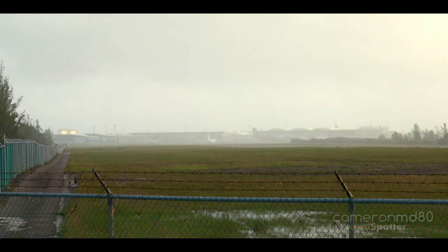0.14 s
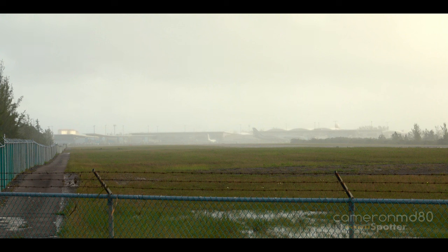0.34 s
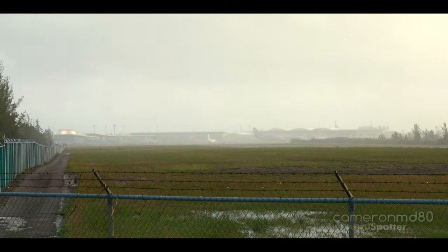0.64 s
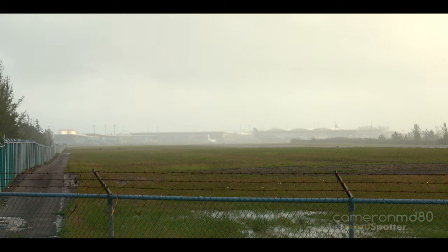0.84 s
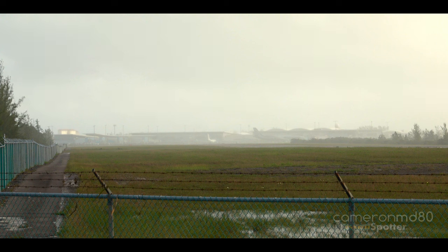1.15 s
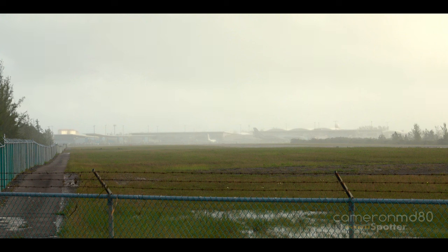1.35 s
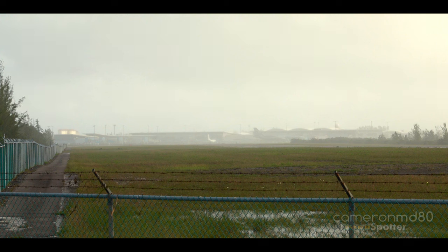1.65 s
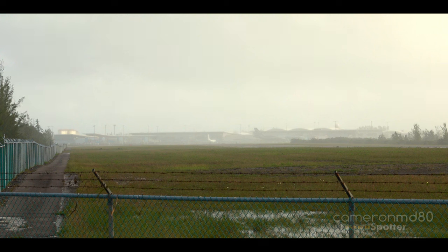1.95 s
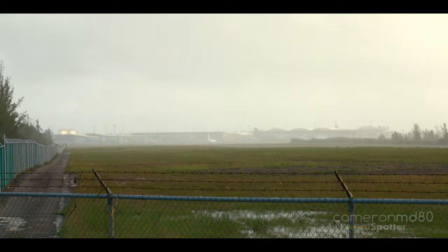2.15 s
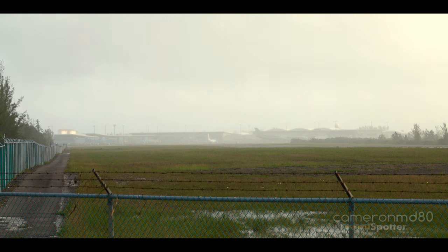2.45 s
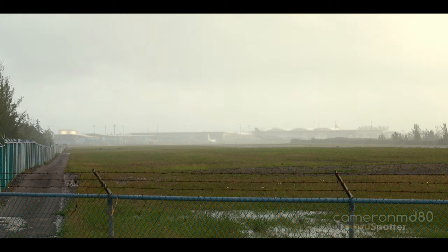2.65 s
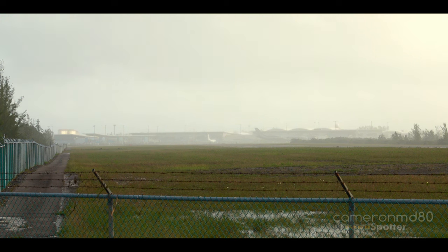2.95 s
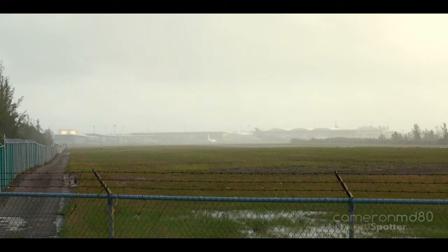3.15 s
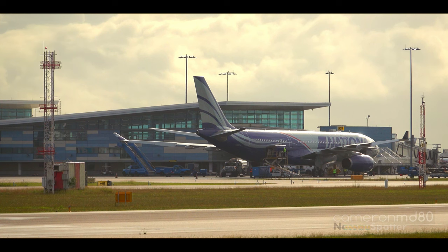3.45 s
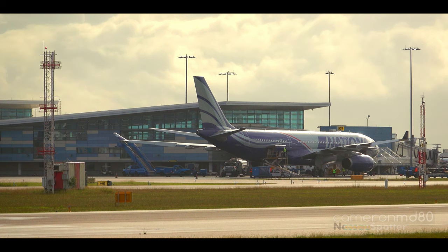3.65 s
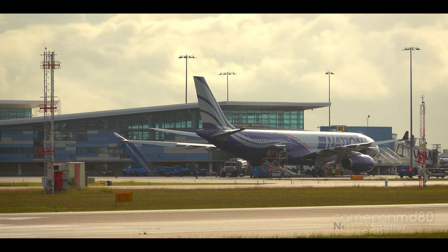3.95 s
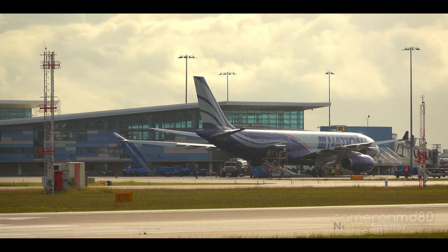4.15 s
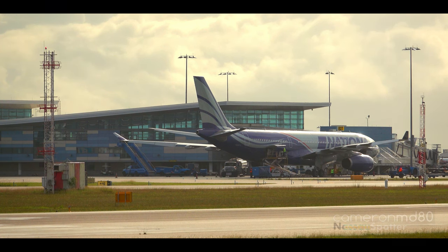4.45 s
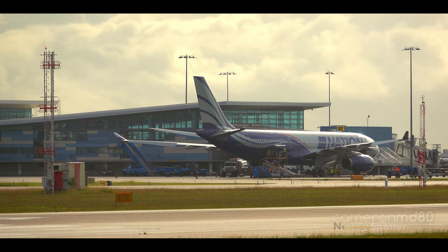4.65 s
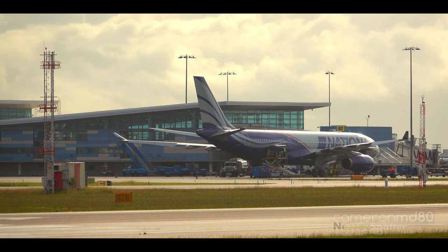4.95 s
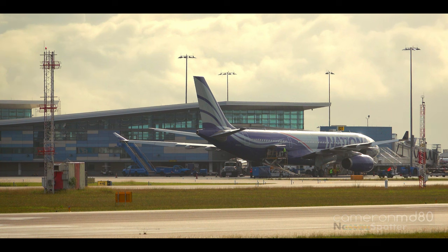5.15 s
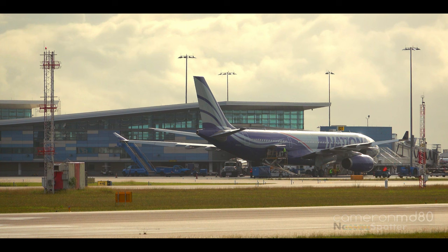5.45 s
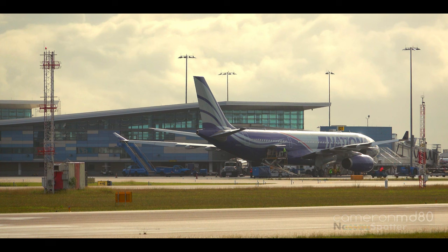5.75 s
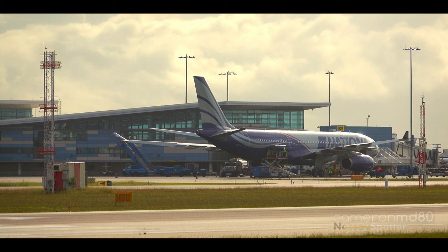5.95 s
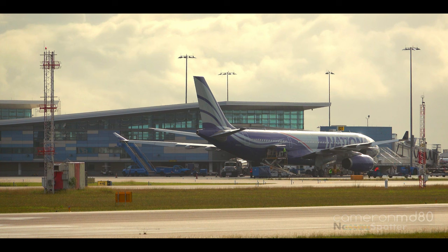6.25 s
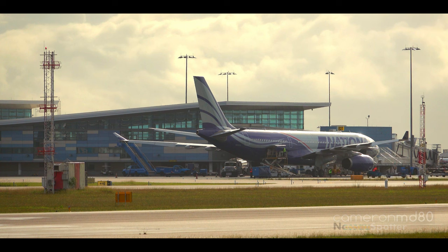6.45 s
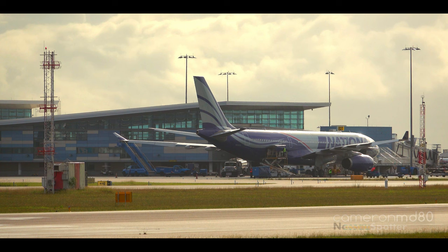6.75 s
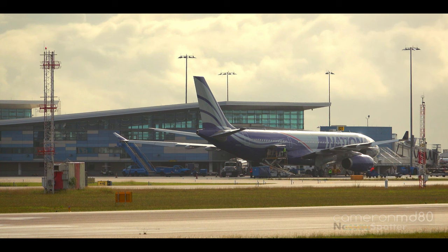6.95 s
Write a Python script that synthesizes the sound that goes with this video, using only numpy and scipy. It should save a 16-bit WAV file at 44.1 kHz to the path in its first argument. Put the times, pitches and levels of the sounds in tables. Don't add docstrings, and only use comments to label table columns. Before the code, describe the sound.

Wind thumps the microphone as a deep engine hum fades and a rushing airport roar with faint turbine whine takes over.

```python
import sys
import numpy as np
from scipy import signal
from scipy.fft import rfft, irfft, next_fast_len
from scipy.io import wavfile
from scipy.ndimage import uniform_filter1d, map_coordinates

SR = 44100
rng = np.random.default_rng(int(sys.argv[2]) if len(sys.argv) > 2 else 0)


def digitize_waveform(pressure):
    field = np.atleast_2d(pressure).T
    bounded = np.clip(field, -1, 1)
    quanta = np.round(bounded * 32767).astype(np.int16)
    wavfile.write(sys.argv[1], SR, quanta)


def voltage_ratio(level):
    return 10 ** (np.asarray(level, float) / 20)


N = 312669
T = np.arange(N) / SR


def unit(x):
    return x / np.sqrt(np.mean(x ** 2) + 1e-20)


def along(points, hz):
    f, v = np.transpose(points)
    return np.interp(np.log(hz + 1), np.log(f + 1), v)


def curves(rows):
    seconds, *columns = np.transpose(rows)
    return [np.interp(T, seconds, column) for column in columns]


def bumps(rows):
    return sum(size * np.exp(-((T - s) / half) ** 2) for s, half, size in rows)


def wobble(rate):
    knots = rng.standard_normal(int(N * 80 / SR) + 4)
    return map_coordinates(knots, [T * min(rate, 80)])


def tone(hz):
    return np.sin(2 * np.pi * np.cumsum(hz) / SR)


def filtered(x, response):
    m = next_fast_len(N + SR // 2)
    return irfft(rfft(x, m) * response(np.fft.rfftfreq(m, 1 / SR)), m)[:N]


def rush(spectrum, patchy_db):
    z = signal.stft(rng.standard_normal(N), nperseg=512)[2]
    patches = uniform_filter1d(rng.standard_normal(z.shape), size=5, axis=0)
    patches = uniform_filter1d(patches, size=14, axis=1)
    x = signal.istft(z * voltage_ratio(patchy_db * unit(patches)), nperseg=512)[1][:N]
    return unit(filtered(x, lambda hz: voltage_ratio(along(spectrum, hz))))


# (start [s], end [s])
FADE = (2.32, 3.86)


def fade():
    start, end = FADE
    turn = np.pi / 2 * np.clip((T - start) / (end - start), 0, 1)
    return np.cos(turn), np.sin(turn)


def blend(field_db, terminal_db):
    field, terminal = fade()
    return np.hypot(field * voltage_ratio(field_db), terminal * voltage_ratio(terminal_db))


# (frequency [Hz], density [dB per Hz])
SELF_NOISE = [(3000, -21), (6000, 3), (9500, -1.5), (16000, -3)]
# (time [s], half length [s], level [dB])
GAIN_SAG = [
    (1.6, .7, -1.8),
    (5.0, 0.69, 1.1),
    (6.2, 0.61, -1),
]


def microphone_hiss():
    level = blend(-75, -71.5) * voltage_ratio(3.5 + bumps(GAIN_SAG))
    return level * rush(SELF_NOISE, patchy_db=0.2)


# (frequency [Hz], density [dB per Hz])
WINGS = [(7300, -46.5), (7700, -12), (8050, -6.5), (8300, -4), (8550, -4.5), (8750, -13), (8950, -8.5),
         (9150, -23), (9500, -47.5)]
# (time [s], half length [s], level [dB])
CHORUS_SWAY = [
    (.65, .3, 2),
    (2.65, 0.06, 3),
    (4.1, .25, 2.8),
    (5.4, 0.62, 2),
    (6.4, .3, -0.5),
]


def insect_chorus():
    lead_depth, lead_grows_s = 0.6, 2.1
    depth = lead_depth * np.clip(0.3 + 0.7 * T / lead_grows_s, 0, 1) * fade()[0] ** 2
    beat = 1 + depth * np.cos(2 * np.pi * (57.2 * T - 0.18))
    shimmer = beat * voltage_ratio(0.29 * wobble(9) + 0.29 * wobble(35))
    level = blend(-79, -65.5) * voltage_ratio(bumps(CHORUS_SWAY))
    return level * unit(shimmer * rush(WINGS, patchy_db=1.0))


def cricket():
    stroke = (42.04 * T + 0.05) % 1
    gate = np.clip(1 - ((stroke - 0.5) / 0.31) ** 2, 0, 1)
    hz = 7130 - 260 * (stroke - 0.5) + 30 * wobble(70)
    trill = unit(gate * voltage_ratio(0.8 * wobble(40)) * tone(hz))
    level_db = -73 + bumps([(0.85, 0.25, -3)])
    return voltage_ratio(level_db) * fade()[0] ** 0.56 * trill


# (start [s], length [s], rms level [dB])
LENS = [
    (1.105, .045, -68.5),
    (1.185, 0.071, -75),
    (1.34, 0.13, -66),
    (1.46, .1, -71),
    (1.6, .15, -86),
    (2.335, 0.39, -66),
    (2.79, 0.15, -76.5),
]
# (frequency [Hz], width [Hz], level [dB])
LENS_BODY = [(2800, 1500, -11.5), (4320, 290, 0), (5800, 1500, -15)]


def lens_body(f):
    total = 0
    for k, (centre, width, db) in enumerate(LENS_BODY):
        total = total + (-1) ** k * voltage_ratio(db) * 1j * f * width / (centre ** 2 - f ** 2 + 1j * f * width)
    return total


def lens_motor():
    teeth_per_s, spin_up_s, run_down_s = 104.5, 0.03, 0.04
    at = (np.arange(110, 320) + 0.36 + 0.04 * rng.standard_normal(210)) / teeth_per_s
    ticks = np.zeros(N)
    ticks[(at * SR).astype(int)] = voltage_ratio(2.4 * rng.standard_normal(len(at)))
    ticks += 0.055 * rng.standard_normal(N)
    running = np.zeros(N)
    for start, length, db in LENS:
        spin_up = np.clip((T - start) / spin_up_s, 0, 1)
        run_down = np.exp(-np.clip(T - start - length, 0, None) / run_down_s)
        running += voltage_ratio(db) * spin_up * run_down
    return running * unit(filtered(ticks, lens_body))


# (time [s], peak level [dB])
CLICKS = [(1.1386, -47), (1.338, -32), (1.365, -52), (1.713, -45), (1.762, -50), (2.35, -53), (2.394, -48),
          (2.541, -52), (2.569, -54), (2.646, -48), (2.769, -50), (2.803, -52)]
# (frequency [Hz], level [dB], time to fall 60 dB [s])
SHELL = [(1300, 4.5, 0.014), (1980, -6, .01), (3700, -8, 0.02), (3920, -4.5, 0.01), (4900, -9, 0.0069),
         (5600, -22, 0.0037), (6860, -11, .006), (6730, -9.5, 0.0069), (7800, -14, 0.0044),
         (9000, -11, 0.0031)]


def body_clicks():
    out = np.zeros(N)
    t = T[:SR // 20]
    ring = sum(voltage_ratio(db - 60 * t / t60) * np.sin(2 * np.pi * hz * t) for hz, db, t60 in SHELL)
    rise = 1 - np.exp(-(t / 0.0002) ** 2)
    bright = np.diff(np.hanning(10))
    for s, db in CLICKS:
        noise = np.convolve(rng.standard_normal(len(t)), bright, "same")
        crack = 0.9 * voltage_ratio(-60 * t / 0.006) * noise
        out[round(s * SR):][:len(t)] += voltage_ratio(db - 3) * rise * (ring + crack)
    return out


# (time [s], half length [s], level [dB])
RUBS = [
    (1.13, .012, -69),
    (1.367, .01, -67),
    (1.39, .01, -65),
    (1.415, .014, -59),
    (1.438, .01, -64),
    (1.5, .05, -69),
    (3.33, .025, -67),
    (3.41, .05, -63.5),
    (3.59, .035, -65),
]
# (frequency [Hz], density [dB per Hz])
SKIN = [(1000, -40), (2000, -4), (3000, 0), (4000, -7), (5000, -8), (6100, -5), (7500, -9), (9500, -10),
        (10800, -24), (16000, -36)]


def sliding_hand():
    slide = bumps([(s, half, voltage_ratio(db)) for s, half, db in RUBS])
    return slide * unit(voltage_ratio(2 * wobble(79)) * rush(SKIN, patchy_db=2.5))


# (time [s], level [dB])
WIND = [(0, -32.5), (.5, -33), (1.05, -25.5), (1.55, -31.5), (2.0, -30), (3.3, -29.5), (3.7, -31),
        (4.3, -27.5), (5.2, -26), (5.6, -27), (6.3, -24.5), (6.6, -33), (7.09, -29)]
# (frequency [Hz], density [dB per Hz])
BUFFET = [(2, -18.5), (8, 4), (16, 2), (27, 3.5), (50, -12.5), (75, -26.5), (120, -80), (300, -150)]
# (time [s], level over the wind [dB])
BLOWS = [(.42, 7), (.6, 1), (0.831, 3.5), (1.06, 5), (1.15, 18), (1.451, 22), (1.75, 5.5), (2.19, 1),
         (2.5, 6), (2.7, 4.5), (3.47, 7), (3.7, 18), (3.85, 8), (4.04, 8), (4.548, 7.5), (4.75, 2),
         (4.86, 1), (5.341, 10), (5.52, 12), (5.65, 11.5), (5.95, 7.5), (6.289, 12.5), (6.651, 10.5),
         (6.84, 9.5)]


def wind():
    blow_half_s, lull_db = 0.036, 0.5
    x = rush(BUFFET, patchy_db=2.5)
    x /= np.sqrt(np.abs(uniform_filter1d(x ** 2, size=SR // 10)) + 0.29)
    blows_db = bumps([(s, blow_half_s, db) for s, db in BLOWS])
    x = voltage_ratio(curves(WIND)[0] + lull_db + blows_db) * unit(x)
    return x / (1 + np.abs(x / 0.2) ** 4) ** (1 / 4)


# (frequency [Hz], density [dB per Hz])
FIELD = [(40, -45), (60, 16.5), (110, -0.5), (150, -8), (300, -17.5), (800, -22), (1000, -28.5),
         (1280, -31.5), (1400, -24), (1550, -33), (2500, -43), (4400, -53), (5000, -55.5), (9000, -61.5)]
TERMINAL = [(40, -19), (60, 9), (116, -2), (480, -11), (690, -14), (910, -21), (1400, -21), (1650, -28.5),
            (2700, -35.5), (3100, -39.5), (4300, -41.5), (4800, -44.5), (7200, -49.5), (9000, -60.5)]
# (frequency [Hz], ..)
SPLITS_HZ = (30, 140, 420, 900, 2600, 11000)
# (level [dB], ..)
FIELD_DB = (-41, -45, -48.5, -54, -66)
TERMINAL_DB = (-36.5, -47, -50.5, -46.5, -64.5)
# (time [s], level [dB])
AIR = [(0, -1), (.9, -0.5), (1.65, 1.5), (1.85, -4.5), (2.2, -3), (2.6, -0.4), (3.3, 2), (3.9, 0.3),
       (4.4, 0.75), (5.2, 0.1), (6.4, -1), (6.8, 0), (7.09, 2)]
AIR_SHARE = (.1, 0.22, 0.34, 1.1, 0.79)
# (time [s], half length [s], level [dB], centre [Hz])
SURGES = [(1.199, 0.15, 12.5, 287), (1.5, 0.15, 10, 218), (1.947, 0.17, 4.5, 260), (2.33, 0.1, -6, 68.2),
          (2.77, 0.16, 7.5, 380), (3.1, 0.28, 5.5, 70.53), (3.293, 0.093, 5, 398), (3.485, 0.22, 7.5, 4010),
          (3.694, .15, -0.5, 72), (5.0, 0.069, -2.5, 68.6), (5.48, 0.15, 2, 1806), (6.0, 0.21, 0.5, 1410),
          (5.8, 0.28, -9.5, 129.6), (6.287, 0.069, 6, 122), (6.609, 0.12, 4, 348), (6.901, 0.097, -8, 70)]


def below(hz, edge):
    return 1 / (1 + (hz / edge) ** 6)


def roar():
    surge_octaves = 0.96
    air_db, = curves(AIR)
    field, terminal = fade()
    field_noise = rush(FIELD, patchy_db=0.94)
    terminal_noise = rush(TERMINAL, patchy_db=0.8)
    total = np.zeros(N)
    bands = zip(AIR_SHARE, SPLITS_HZ, SPLITS_HZ[1:], FIELD_DB, TERMINAL_DB)
    for share, lo, hi, field_db, terminal_db in bands:
        band = lambda hz: np.sqrt(np.abs(below(hz, hi) - below(hz, lo)))
        near = lambda hz: np.exp(-(np.log2(hz / np.sqrt(lo * hi)) / surge_octaves) ** 2)
        surge_db = bumps([(s, half, db * near(hz)) for s, half, db, hz in SURGES])
        here = voltage_ratio(field_db) * field * unit(filtered(field_noise, band))
        there = voltage_ratio(terminal_db) * terminal * unit(filtered(terminal_noise, band))
        total += voltage_ratio(share * air_db + surge_db) * (here + there)
    return total


def far_lines(table, drift_hz, flutter_db):
    total = np.zeros(N)
    for hz, db in table:
        level = voltage_ratio(db + 3 + flutter_db * wobble(3))
        total += level * tone(hz + drift_hz * wobble(6))
    return total


# (frequency [Hz], level [dB])
WHINES = [(694.8, -59), (1395, -61), (3757.5, -81), (3856.5, -83), (3955, -88), (4054, -88), (4153, -85),
          (5563, -89), (8926, -90)]


def turbine_whines():
    growth_db = 0.8 * (T - 6)
    return fade()[1] * voltage_ratio(growth_db) * far_lines(WHINES, drift_hz=2.2, flutter_db=2.8)


# (frequency [Hz], level [dB])
OVERTONES = [(124, -50.5), (168, -50), (249, -53), (402, -58)]


def engine_overtones():
    return fade()[0] ** 0.43 * far_lines(OVERTONES, drift_hz=1.0, flutter_db=2.2)


# (time [s], firing rate [Hz], level [dB])
DRONE = [(0, 85.3, -25), (.14, 83.6, -23), (.3, 84.2, -19.5), (.45, 83.4, -20.5), (.6, 84.05, -23),
         (.8, 83.25, -22.5), (1.12, 83.3, -23), (1.3, 84.5, -22), (1.52, 84.1, -23.5), (1.75, 84.2, -33),
         (2.1, 85.4, -39), (2.25, 84.2, -54), (2.38, 82.35, -28.5), (2.55, 84.6, -28), (2.75, 81.95, -32.5),
         (2.9, 84.5, -42), (3.25, 83.5, -44), (3.5, 83, -51)]


def engine_drone():
    hz, db = curves(DRONE)
    level = voltage_ratio(db + 2.0 + 0.22 * wobble(6))
    return level * np.cos(np.pi / 4 + 2 * np.pi * np.cumsum(hz) / SR)


def scene():
    insects = insect_chorus() + cricket()
    camera = lens_motor() + body_clicks() + sliding_hand()
    engines = turbine_whines() + engine_overtones() + engine_drone()
    return (microphone_hiss() + insects + camera + wind() + roar() + engines)[None]


def roll_off(x):
    return signal.sosfilt(signal.butter(12, 16760, fs=SR, output="sos"), x)


# (time [s], depth [dB])
DUCKS = [
    (1.072, -4),
    (1.141, -7),
    (1.432, -3),
    (1.449, -6),
    (1.52, -2),
    (3.688, -4),
    (5.348, -3),
    (5.49, -2),
    (6.24, -2),
    (6.278, -3),
]


def record(dry):
    attack_s, release_s, top_hz = 0.003, 0.035, 15730
    duck_db = np.zeros(N)
    for s, db in DUCKS:
        late = np.clip(T - s, 0, None)
        duck_db += db * (1 - np.exp(-late / attack_s)) * np.exp(-late / release_s)
    x = dry * voltage_ratio(1.2 * duck_db)
    x = x / (1 + np.abs(x / 0.26) ** 8) ** (1 / 8)
    x = filtered(x[0], lambda hz: hz < top_hz)[None]
    return roll_off(x)


dry = scene()
out = record(dry)
digitize_waveform(out)
```